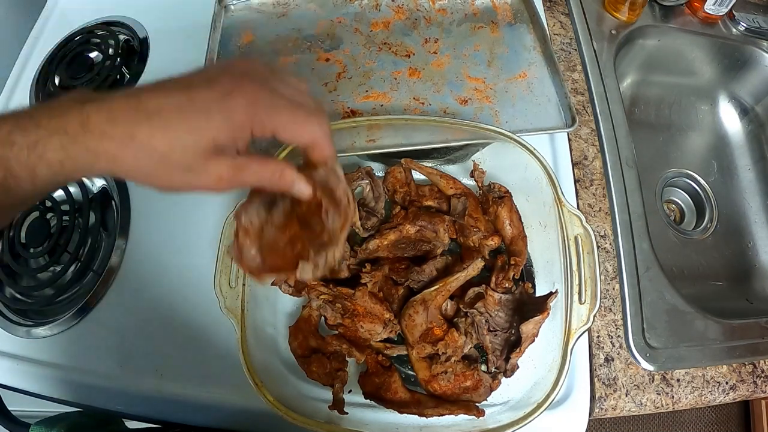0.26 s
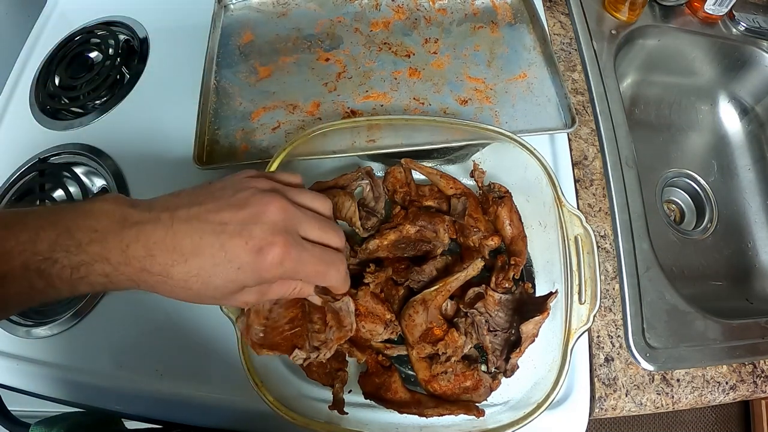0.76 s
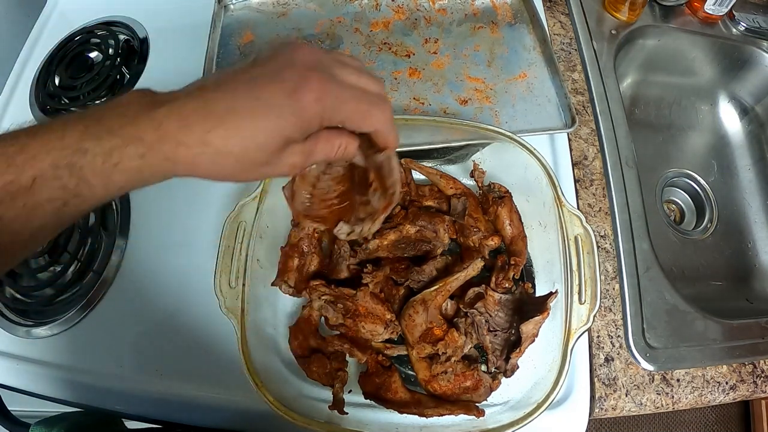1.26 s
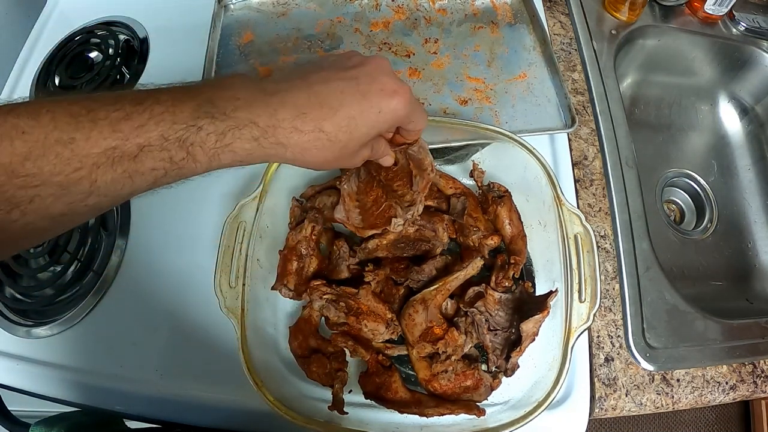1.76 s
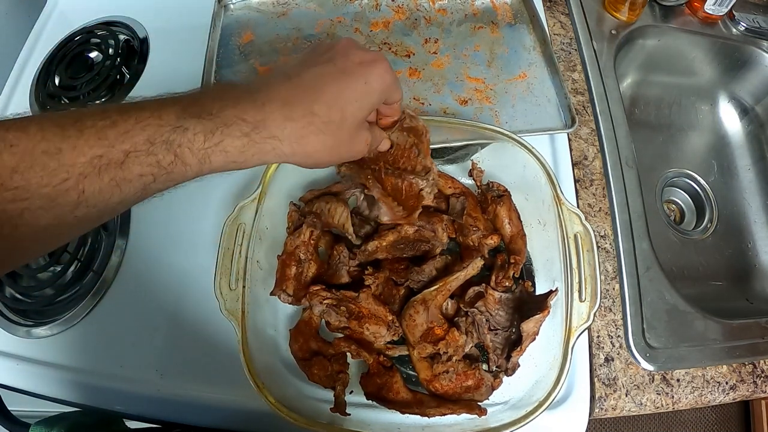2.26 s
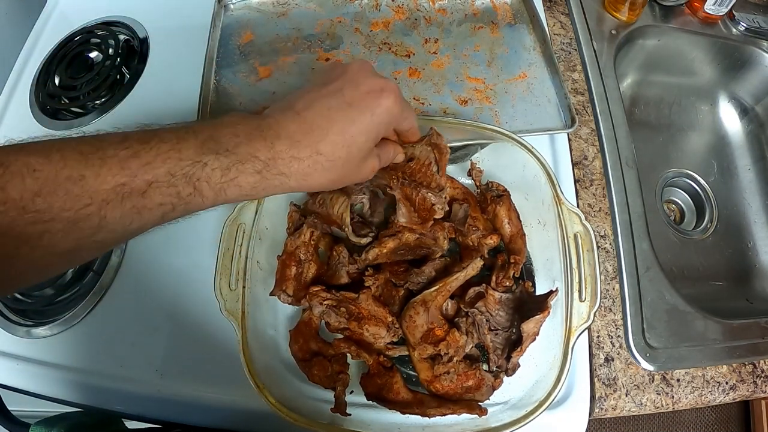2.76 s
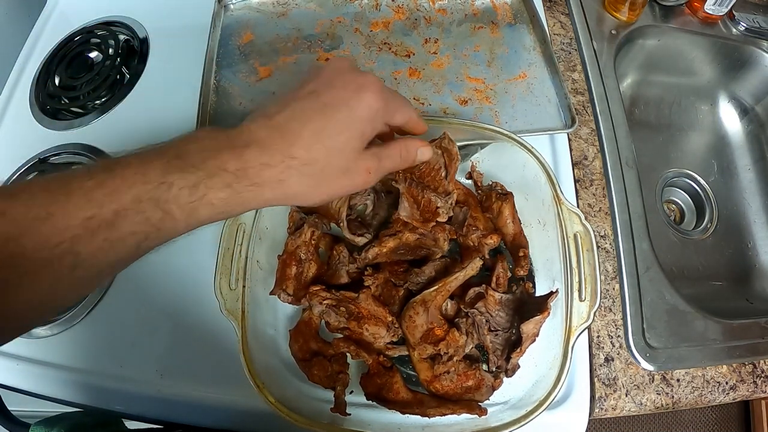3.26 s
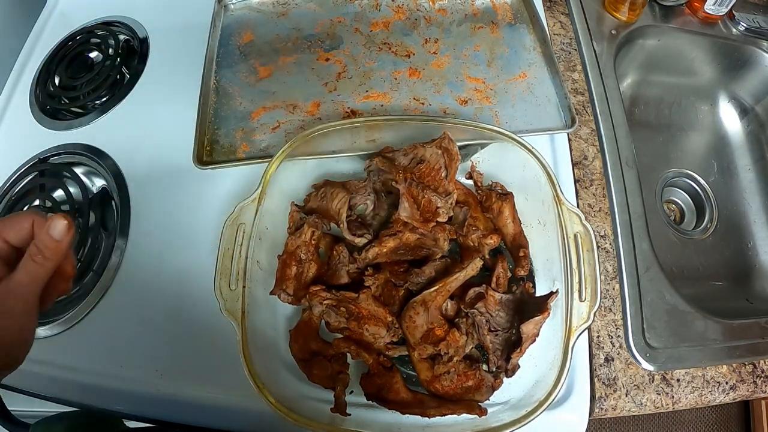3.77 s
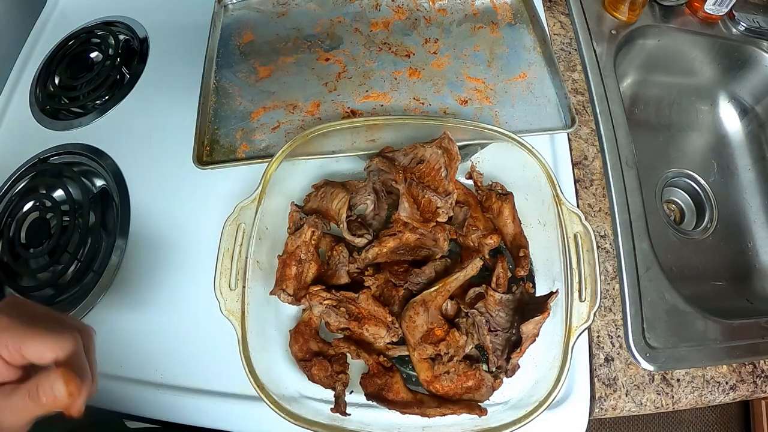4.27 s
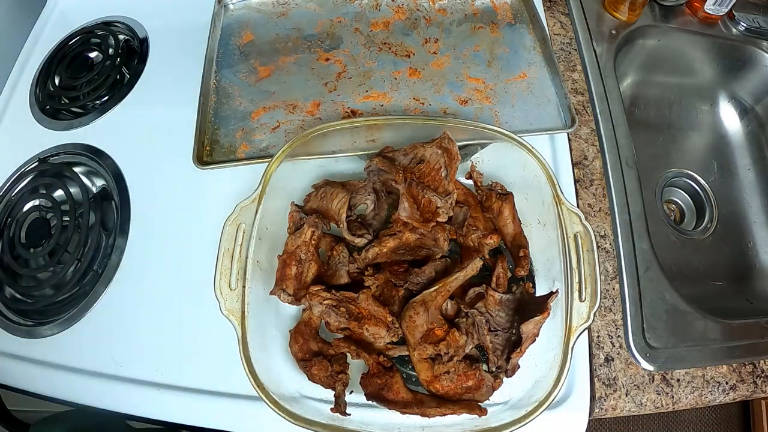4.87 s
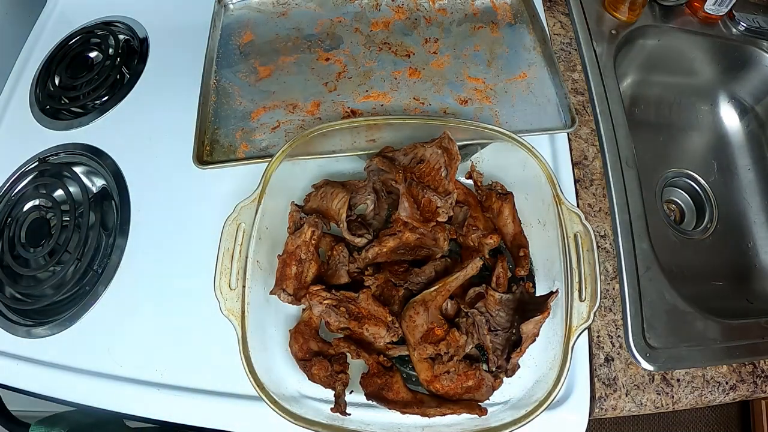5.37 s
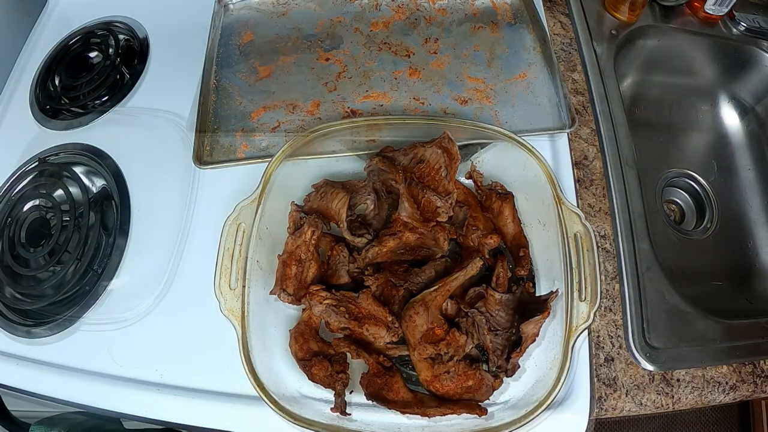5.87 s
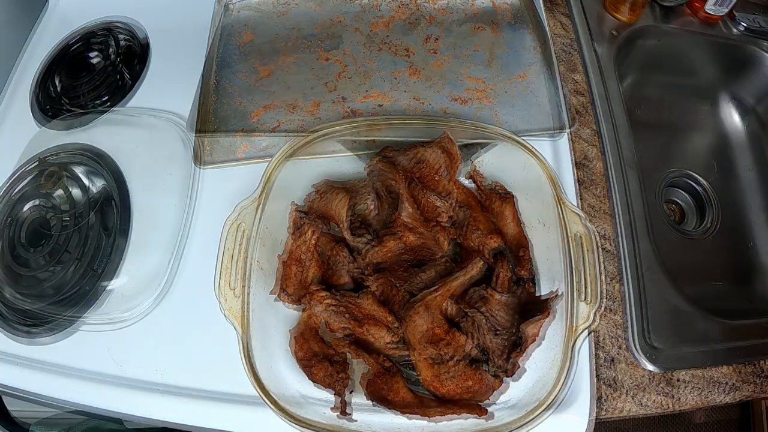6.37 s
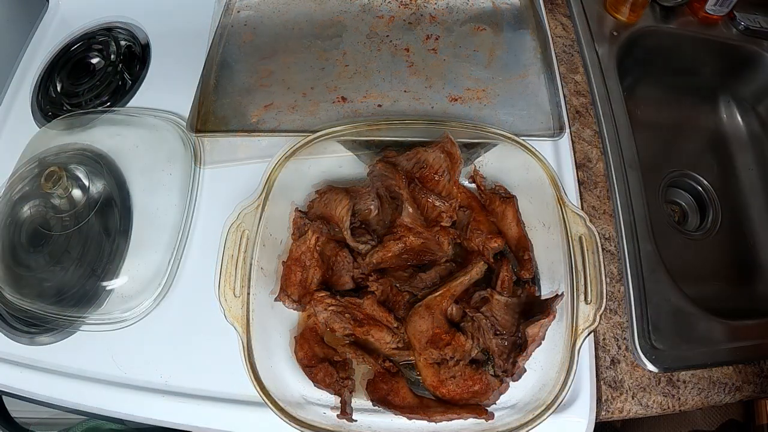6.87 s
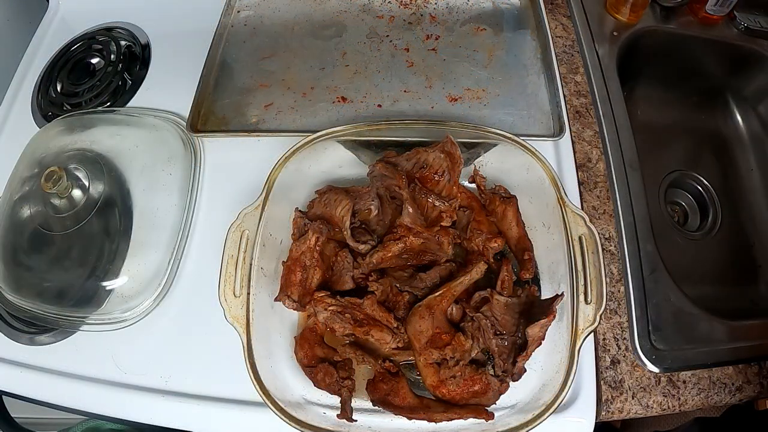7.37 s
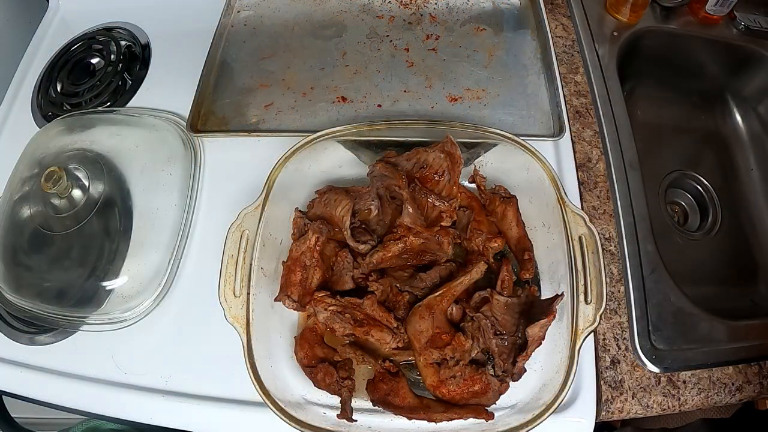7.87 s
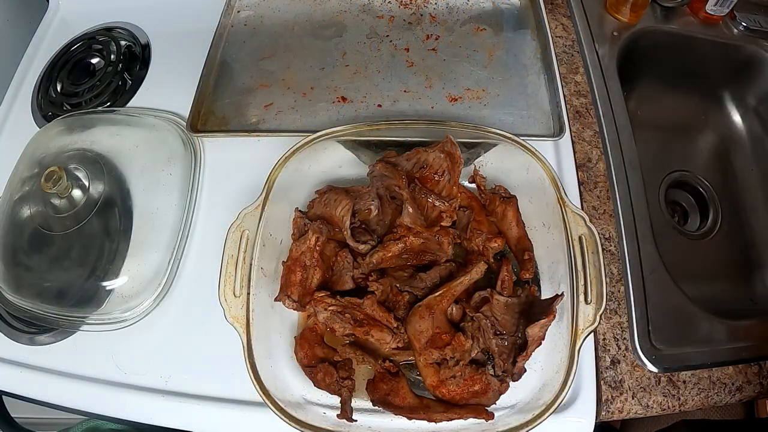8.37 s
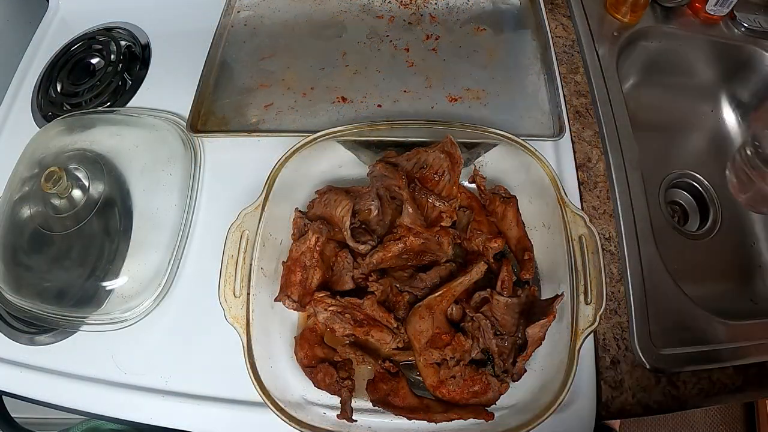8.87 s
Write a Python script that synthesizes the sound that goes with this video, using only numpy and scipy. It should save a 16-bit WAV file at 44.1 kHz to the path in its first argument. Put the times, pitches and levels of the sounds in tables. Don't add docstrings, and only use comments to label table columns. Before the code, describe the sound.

A close stereo microphone by a stove in a small kitchen, with faint room hum throughout. From 0 to 0.8 seconds a heavy glass dish is jolted and dragged, with dense short glassy chatter and gritty rattling of the enamel stove plate over low pushing rumble. It thins to a few touches, then knocks and scrapes again at 1.6 to 2.1. Small damp pops occur around 1.9 to 3.2. At 2.8 to 3.8 the dish rocks in bright knocks, loudest at 3.3, fading by 4.2. Cloth rustle and small taps follow at 4.3 to 4.9. From 5 low soft footfalls bump the floor. At 6.1 a cupboard door thuds with a low hollow ring and quick rebound. Light taps come at 6.5 to 7.2, then a tap hisses airily into a glass from 7.24 to 8.05, slightly left. Low bumps, a soft knock and rustling continue to just past 9.

```python
import sys
import numpy as np
from scipy import signal
from scipy.fft import rfft, irfft, next_fast_len
from scipy.io import wavfile
from scipy.ndimage import uniform_filter1d

SR = 44100
rng = np.random.default_rng(int(sys.argv[2]) if len(sys.argv) > 2 else 0)


def boost_factor(decibels):
    exponent = np.asarray(decibels, float) / 20
    return 10 ** exponent


def put_to_file(sound):
    columns = np.atleast_2d(sound).T
    safe = np.clip(columns, -1, 1)
    whole_steps = np.round(safe * 32767)
    wavfile.write(sys.argv[1], SR, whole_steps.astype(np.int16))


N = 401751

# time in seconds, peak level in dB, share of bass in dB, brightness in dB.
ROCKS = [(0.2211, -34, -16, -7), (0.7783, -35, -4, -19), (0.9504, -41, -16, -11.5), (1.184, -46, -3, -16),
         (1.4297, -47.5, -9, -16), (1.6122, -52, -26, -13), (1.649, -29, -3.5, -9),
         (1.8972, -28.5, -1.5, -8.5), (2.3546, -50, 2, -14), (2.5138, -43, -7.5, -1),
         (2.657, -52.5, -8.5, -9), (2.8448, -33, -2.5, -8), (3.0629, -30, -5.5, -7.5),
         (3.216, -32.5, -20, -9), (3.289, -23.5, 0.5, -2), (3.4065, -28.5, 1, -6),
         (3.5124, -27, -13.5, -6.5), (3.6401, -31.5, -5, -7.5), (3.7627, -36, -7.5, -8),
         (3.899, -38, -8, -10), (4.0502, -46, -6.5, -7.5), (4.205, -46.5, -8, -10)]
ROCK_TREBLE_DB = -11
BACKGROUND_CHANGE_S = (3.2, 6.4)


def rms_one(x):
    return x / np.sqrt(np.mean(x ** 2) + 1e-30)


def at_hz(points, hz):
    table_hz, value = np.array(points).T
    return np.interp(np.log(hz), np.log(table_hz), value)


def drift(rate_hz):
    step = 40
    r = np.exp(-2 * np.pi * step * rate_hz / SR)
    noise = rng.standard_normal(N // step + 2002)
    slow = signal.lfilter([1], [1, -2 * r, r * r], noise)[2000:]
    return np.interp(np.arange(N) / step, np.arange(len(slow)), rms_one(slow))


def background_change():
    return np.interp(np.arange(N) / SR, BACKGROUND_CHANGE_S, [0, 1])


def strike(times, gains):
    clicks = np.zeros(N)
    np.add.at(clicks, np.clip((np.asarray(times) * SR).astype(int), 0, N - 1), gains)
    return clicks


def ring(clicks, hz, t60):
    r = boost_factor(-60 / (t60 * SR))
    w = 2 * np.pi * hz / SR
    return signal.lfilter([0, np.sin(w)], [1, -2 * r * np.cos(w), r * r], clicks + 1e-18)


def burst(times, gains, rise_s, fall_s):
    fall = signal.lfilter([1], [1, -np.exp(-1 / (fall_s * SR))], strike(times, gains))
    r = np.exp(-1 / (rise_s * SR))
    return signal.lfilter([1 - r], [1, -r], fall)


def swell(s, db, rise_s, fall_s, hold_s=0):
    t = np.arange(0, N + 64, 64)[:, None] / SR
    before = (s - t) / rise_s
    after = (t - s - hold_s) / fall_s
    away = np.maximum(np.maximum(before, after), 0)
    return np.interp(np.arange(N) / SR, t[:, 0], boost_factor(db - 20 * away).sum(axis=1))


def grainy(per_s, spread_db, smooth):
    sizes = boost_factor(spread_db * np.minimum(rng.exponential(1, (2, N)), 4))
    sizes = sizes * (rng.random((2, N)) < per_s / SR)
    return rng.standard_normal((2, N)) * (smooth + rms_one(sizes))


def coloured(spectrum, source):
    # pitch in Hz, likeness from 0 to 1.
    likeness = [(100, 0.68), (500, 0.64), (1500, 0.68), (3000, 0.47), (6000, 0.42), (10000, 0.083)]
    size = next_fast_len(source.shape[1])
    hz = np.maximum(np.arange(size // 2 + 1) * SR / size, 1)
    alike = np.clip(at_hz(likeness, hz), 0, 1)
    mid, side = rfft(source, size) * boost_factor(at_hz(spectrum, hz)) * (hz > spectrum[0][0])
    mid = mid * np.sqrt(1 + alike)
    side = side * np.sqrt(1 - alike)
    return rms_one(irfft(np.array([mid + side, mid - side]), size)[:, :source.shape[1]])


def rumble(gain, band_hz):
    band = signal.butter(2, band_hz, "band", fs=SR, output="sos")
    noise = signal.sosfilt(band, rng.standard_normal(N))
    even = noise / np.sqrt(uniform_filter1d(noise ** 2, size=int(1.5 * SR / band_hz[0])) + 1e-12)
    lowpass = signal.butter(4, 1.39 * band_hz[1], fs=SR, output="sos")
    return signal.sosfiltfilt(lowpass, gain * rms_one(even))


def weight_rumble(rows, rise_s, fall_s, upper_hz, rest_db, presence):
    s, *levels = np.transpose(rows)
    out = 0
    for db, band_hz, still_db in zip(levels, ([22, 42], upper_hz), rest_db):
        out = out + rumble(swell(s, db, rise_s, fall_s) + presence * boost_factor(still_db), band_hz)
    return out


def share(events, hz, treble_offset_db):
    s, peak_db, bass_db, bright_db = np.transpose(events)
    if hz < 600:
        return peak_db + bass_db
    if hz < 1900:
        return peak_db
    if hz < 3800:
        return peak_db + bright_db
    return peak_db + 2.05 * bright_db + treble_offset_db


def plate():
    # time in seconds, peak level in dB, share of bass in dB, brightness in dB.
    jolts = [(.003, -36, -31, -2.5), (0.054, -32, -39, 0), (0.159, -30, -9, 1), (0.259, -29.5, -28, -3.5),
             (0.358, -38, -7, -6.5), (0.373, -33, -25, -4.5), (0.402, -45.5, -33, 0), (0.45, -41, -27, -8),
             (0.478, -40, -32, -5), (0.559, -38.5, -21, -7.5), (0.596, -37.5, -36, -3),
             (0.865, -53.5, -3, -7.5), (1.264, -58, -22, -20), (1.739, -40, -31, -6.5),
             (1.751, -48, -27, -3.5), (1.844, -50, 3, -11), (1.885, -45.5, -8, 0.5),
             (2.011, -41.5, 6.5, -3), (2.08, -41.5, -5, -6), (2.127, -48.5, 7, -12), (2.6, -56, -19, -11),
             (3.007, -55.5, 4, -4), (3.286, -31.5, -2.5, -9), (3.335, -38.5, -15, -7.5),
             (3.476, -35, 1, -6)]
    # time in seconds, level in dB, hold in seconds.
    drags = [
        (0, -37, 0.12),
        (0.197, -43.5, 0.42),
        (.968, -56.5, 0.0),
        (1.664, -48, 0.15),
        (1.92, -46.5, 0.023),
        (2.077, -58, 0),
        (3.293, -62, 0.16),
        (3.45, -74, 0),
    ]
    # pitch in Hz, width in Hz, level in dB.
    plate_modes = [(343, 240, -10), (423, 62, -1.5), (812, 170, -9), (1046, 150, -7), (1200, 186, -2),
                   (1670, 460, 1.5), (2345, 360, 4), (2950, 550, 2), (3230, 270, 0), (3630, 740, -3.5),
                   (4640, 570, 4), (5290, 770, 3), (6350, 830, 2.5), (7800, 1640, 0.5), (10800, 3200, -17)]
    jolt_treble_db = -2
    jolt_s, rock_s = np.array(jolts)[:, 0], np.array(ROCKS)[:, 0]
    drag_s, drag_db, hold_s = np.transpose(drags)
    drag = swell(drag_s, drag_db, rise_s=0.03, fall_s=0.11, hold_s=hold_s)
    grit = grainy(per_s=1500, spread_db=2.0, smooth=1.0)
    colour_db = 0.78 * rng.standard_normal((len(jolts), len(plate_modes)))
    out = 0
    for k, (hz, width_hz, level_db) in enumerate(plate_modes):
        fall_s = 0.031 * (1000 / hz) ** 0.4
        jolt_db = share(jolts, hz, jolt_treble_db)
        rock_db = share(ROCKS, hz, ROCK_TREBLE_DB) - (16 if hz > 3800 else 28)
        shake = burst(jolt_s, boost_factor(jolt_db - 10.5 + colour_db[:, k]), rise_s=0.00083, fall_s=fall_s)
        shake = shake + burst(rock_s, boost_factor(rock_db), rise_s=0.001, fall_s=1.2 * fall_s)
        shake = shake + drag * boost_factor(-8.5 - 8.9 * np.log2(max(hz, 900) / 900))
        band = ring(ring(grit[k % 2], hz, 1.66 / width_hz), hz, 1.22 / width_hz)
        snap = ring(strike(jolt_s, boost_factor(jolt_db - 10)), hz, 2.7 / width_hz)
        out = out + boost_factor(level_db) * (shake * rms_one(band) + (-1) ** k * snap)
    return out


def pushes():
    # time in seconds, deep level in dB, upper level in dB.
    push_rows = [(0, -56, -48.5), (.12, -66, -52), (.31, -63, -46), (.53, -69, -52.5), (.8, -78, -63),
                 (1.19, -74, -96.5), (1.73, -53, -53), (1.84, -69, -58), (2.03, -47.5, -52),
                 (2.22, -58, -67), (2.68, -71, -82), (2.92, -63, -55.5), (3.37, -49, -49), (3.59, -52, -59),
                 (3.83, -58.5, -72), (4.37, -69, -79)]
    return weight_rumble(push_rows, rise_s=0.1, fall_s=0.19, upper_hz=(137, 196),
                         rest_db=(-91, -75.5), presence=1 - background_change())


def hum():
    # pitch in Hz, level in dB per Hz.
    early_colour = [(20, -2), (110, -5.5), (330, 0.5), (620, -14), (1250, -9.5), (2300, -19), (3400, -29),
                    (7700, -31), (8600, -36.5), (15500, -51)]
    # pitch in Hz, level in dB per Hz.
    late_colour = [(35, -37), (60, -16.5), (170, -11.5), (350, -13.5), (500, -24), (1200, -31), (7700, -38),
                   (8600, -47), (15500, -55)]
    noise, changed = rng.standard_normal((2, N)), background_change()
    tone = (1 - changed) * boost_factor(-67) * coloured(early_colour, noise)
    tone = tone + changed * boost_factor(-69) * coloured(late_colour, noise)
    whine = boost_factor(-95.5) * np.sin(2 * np.pi * 10255 * np.arange(N) / SR)
    return boost_factor(1.3 * drift(1.8)) * tone + whine


def chatter():
    # time in seconds, peak level in dB, pitch in Hz, time to fall 60 dB in seconds.
    touches = [(.064, -28.5, 1670, .04), (.072, -41, 2190, .04), (.082, -39, 1200, .05),
               (.165, -29.5, 1715, 0.047), (.178, -42, 1150, .05), (.232, -38, 1220, .06),
               (.283, -38, 1005, .05), (.296, -36, 1020, .05), (.308, -33.5, 994, .04),
               (.378, -39, 2310, .05), (.385, -39, 800, .05), (.401, -36, 1240, 0.056),
               (.412, -42, 1170, .06), (.479, -38, 1000, 0.038), (.49, -37, 1650, .04),
               (.504, -36, 1200, 0.033), (.543, -39, 824, .04), (.583, -39, 855, 0.056),
               (.603, -35.5, 2210, 0.042), (.608, -36.5, 1230, 0.05), (.744, -44, 1050, 0.026),
               (.757, -48, 797, .04), (.767, -51, 1120, 0.024), (.792, -41, 1206, 0.044),
               (.794, -53, 2240, 0.045), (.869, -57.5, 2250, 0.085), (.962, -46.5, 1215, 0.073),
               (1.651, -50, 1520, 0.05), (1.74, -39, 1590, 0.024), (1.751, -36, 1133, 0.046),
               (1.765, -36.5, 1157, 0.046), (1.787, -45, 1200, 0.056), (1.887, -40, 2160, 0.027),
               (1.9, -35, 3220, 0.034), (1.93, -42, 502, 0.14), (1.95, -43, 1094, 0.057),
               (2.091, -41, 1230, 0.057), (2.108, -47, 1013, 0.09), (2.124, -43.5, 1214, 0.066),
               (3.289, -33.5, 5100, 0.026), (2.471, -65, 2700, .12), (2.846, -44, 1545, 0.056),
               (3.064, -44.5, 3227, 0.054), (3.289, -26.5, 1540, 0.043), (3.333, -36.5, 1595, 0.034),
               (3.513, -40, 3230, 0.04), (3.408, -41, 2170, 0.037), (3.485, -57, 4650, 0.092),
               (3.492, -38, 1150, 0.072), (3.641, -43, 1510, 0.066)]
    rise_s = 0.0017
    out, t = np.zeros(N + SR), np.arange(SR // 5) / SR
    for s, db, hz, t60 in touches:
        pair = np.sin(2 * np.pi * hz * t) + 0.31 * np.sin(2 * np.pi * 0.91 * hz * t)
        loudness = boost_factor(db + 3 - 60 * t / t60) * (1 - np.exp(-t / rise_s))
        out[int(s * SR):][:len(t)] += loudness * pair
    return out[:N]


def thumps():
    # time in seconds, peak level in dB, pitch in Hz, half length in seconds.
    drops = [(.08, -46, 167, 0.033), (.11, -49, 70, 0.013), (.31, -46, 70.4, .03),
             (.335, -44.5, 131.4, 0.066), (.43, -45, 125, 0.044), (.555, -43, 168.7, 0.051),
             (.755, -49, 155, .02), (.872, -49, 199, 0.0045), (1.82, -49, 147, .025),
             (2.656, -53, 228, 0.0075), (3.1, -56, 175, 0.071), (3.901, -61, 85, 0.031),
             (4.359, -69, 90, .04), (5.95, -53, 202, 0.018), (5.075, -37, 28.7, 0.03),
             (5.142, -42, 29.7, 0.028), (5.247, -41, 26, 0.03), (5.348, -43, 32.4, 0.029),
             (5.435, -42.5, 29.7, 0.037), (5.499, -39, 50, 0.018), (5.54, -38, 33.5, .022),
             (5.576, -35, 32.5, 0.045), (5.715, -47.5, 29.7, .035), (5.83, -27.5, 32.7, .018),
             (5.925, -41, 108, 0.014), (5.98, -37.5, 70, 0.016), (6.049, -44, 60, 0.017),
             (6.887, -42.5, 55, 0.015), (6.918, -45, 89, 0.021), (6.997, -50.5, 34.6, .04),
             (7.159, -43, 50, 0.025), (7.291, -36, 40.4, 0.021), (7.65, -41, 96, 0.026),
             (7.729, -42, 115, .03), (7.83, -44.5, 106, .035), (7.915, -43, 101, 0.022),
             (8.114, -36.5, 45, 0.037), (8.188, -42, 38, .025), (8.313, -36, 33.4, 0.03),
             (8.426, -47.5, 40, 0.03), (8.842, -39.5, 35.03, 0.036), (8.964, -31.5, 28, 0.03),
             (9.026, -34.5, 29.7, 0.015), (9.076, -38.5, 25.9, 0.077)]
    reach = SR // 5
    out, t = np.zeros(N + SR), np.arange(-reach, reach) / SR
    for s, db, hz, half_s in drops:
        load = np.exp(-(t / half_s) ** 2)
        out[int(s * SR):][:len(t)] -= boost_factor(db) * load * np.cos(2 * np.pi * hz * t)
    return out[reach:reach + N]


def rocks():
    # pitch in Hz, level in dB, time to fall 60 dB in seconds.
    dish_modes = [(354.5, -4, 0.2), (421, -13.5, 0.3), (492.3, -11.5, 0.13), (1037, -10.5, 0.097),
                  (1365, -3, 0.028), (1175, 0, 0.065), (1536, -1, 0.055), (1820, -36, 0.095),
                  (2170, 6, 0.043), (2663, 4, 0.041), (3220, -8.5, 0.098), (5100, -10, .05),
                  (7960, -22.5, .05)]
    muffled_modes, muffled_until_s, muffled_db = (6, 9, 10), 1.63, -9
    longest_t60_s = 0.075
    s = np.array(ROCKS)[:, 0]
    luck = rng.standard_normal((len(s), len(dish_modes)))
    out = 0
    for k, (hz, level_db, t60) in enumerate(dish_modes):
        db = share(ROCKS, hz, ROCK_TREBLE_DB) + level_db - 5.5 + 1.15 * luck[:, k]
        if k in muffled_modes:
            db = db + muffled_db * (s < muffled_until_s)
        mode = ring(strike(s, boost_factor(db)), hz, t60 if hz < 600 else min(t60, longest_t60_s))
        out = out + ring(mode, hz, 0.0082) * 1150 / SR
    return out


def ticks():
    # time in seconds, peak level in dB, pitch in Hz, time to fall 60 dB in seconds.
    taps = [(.734, -36.5, 790, 0.03), (.908, -42.5, 760, 0.036), (4.32, -41.5, 4250, 0.023),
            (2.652, -53.5, 486, 0.058), (8.78, -46, 4000, 0.043), (1.28, -55, 1500, .06),
            (2.618, -51, 1260, 0.046), (.87, -56, 1200, .08), (4.44, -52, 900, .06),
            (4.475, -47, 1200, 0.056), (4.816, -56, 3800, .004), (6.489, -39.5, 333, 0.04),
            (7.193, -34.5, 443, 0.046), (7.192, -55, 1800, 0.065), (6.5, -55, 1230, 0.066),
            (6.1, -59, 2500, 0.088), (6.706, -47, 284, 0.2), (6.72, -42.5, 4100, .004),
            (7.215, -35, 265, 0.14), (8.074, -32, 298, 0.062), (8.3, -50, 340, 0.073),
            (8.95, -42.5, 270, 0.11), (9.1, -45, 1400, 0.055)]
    out = 0
    for s, db, hz, t60 in taps:
        click = strike([s], boost_factor(db - 10))
        ratios = (0.97, 1.04) if hz > 900 else (0.75, 1, 1.4)
        group = sum(ring(click, hz * ratio, t60) for ratio in ratios)
        out = out + ring(group, hz, 3 / hz) * 5.24 * hz / SR
    return out


def smacks():
    # time in seconds, level in dB.
    unstuck = [(1.564, -61), (1.762, -61), (1.805, -59), (1.889, -38.5), (2.227, -66), (2.297, -65),
               (2.472, -62), (2.545, -60), (2.57, -69), (2.593, -57), (2.65, -52), (2.656, -60),
               (2.722, -68), (2.746, -69), (2.812, -70), (2.83, -70), (3.01, -63), (3.234, -53),
               (3.278, -56), (3.54, -60), (4.319, -65), (4.816, -53), (8.81, -62), (8.97, -47)]
    s, db = np.transpose(unstuck)
    pops = burst(s, boost_factor(db), rise_s=0.00033, fall_s=0.0021) * rng.standard_normal(N)
    return signal.sosfilt(signal.butter(4, (5500, 13000), "band", fs=SR, output="sos"), pops)


def rustle():
    # time in seconds, bright level in dB, dull level in dB, rise in seconds, fall in seconds.
    brushes = [(3.5, -78, -99, 1.8, 2.3), (4.06, -94, -60.5, 0.016, 0.69), (4.33, -67.5, -66, 0.24, 0.13),
               (4.475, -63.5, -42, 0.15, 0.089), (4.65, -80.5, -83, 0.38, 1.3),
               (4.818, -51.5, -87, 0.0083, 0.1), (4.93, -67, -67, 0.15, 0.51),
               (5.09, -58.5, -57.5, 0.01, 0.19), (5.29, -84, -71.5, 0.82, 0.32),
               (5.46, -56.5, -56, 0.073, 0.14), (5.65, -76.5, -59, 0.13, 0.67),
               (5.838, -72.5, -83, 0.061, 0.16), (6.2, -74.5, -72, 0.31, 0.51), (6.5, -76, -64, 0.18, 0.29),
               (6.73, -62, -74, 0.15, 0.075), (6.8, -66, -55, 0.1, 0.21), (8.13, -71, -52, 0.38, 1.4),
               (8.714, -61.5, -67.5, 0.49, 0.045), (8.78, -58.5, -85, 0.053, 0.11),
               (8.988, -71.5, -79, 0.14, 0.07), (9.11, -62, -51.5, 0.23, .1)]
    # pitch in Hz, level in dB per Hz.
    bright_colour = [(710, -29.5), (1200, -10), (1600, -3.5), (1780, -2), (1900, 0.5), (3320, 2.5),
                     (7250, -2), (12600, -27), (15500, -35)]
    # pitch in Hz, level in dB per Hz.
    dull_colour = [(250, 6.5), (500, -0.5), (760, 2.5), (950, 6.5), (1400, 6), (2200, 0.5), (3500, -35)]
    s, bright_db, dull_db, rise_s, fall_s = np.transpose(brushes)
    fine = coloured(bright_colour, grainy(per_s=1300, spread_db=2.0, smooth=4.2))
    coarse = coloured(dull_colour, grainy(per_s=400, spread_db=0.0, smooth=2.6))
    bright = boost_factor(3.0 + 1.46 * drift(23)) * swell(s, bright_db, rise_s, fall_s) * fine
    dull = boost_factor(-7.5 + 2.3 * drift(14)) * swell(s, dull_db, rise_s, fall_s) * coarse
    return bright * boost_factor(np.array([[0.8], [-0.8]])) + dull


def steps():
    # time in seconds, deep level in dB, upper level in dB.
    step_rows = [(5.07, -48, -64), (5.16, -69, -57), (5.27, -67, -90), (5.37, -54, -88.5),
                 (5.54, -45, -57.5), (5.65, -60, -74), (5.828, -48, -62), (5.93, -51, -42), (6.0, -61, -59),
                 (6.09, -60, -59), (6.27, -45.5, -53), (6.37, -57, -65), (6.51, -62, -53.5),
                 (6.75, -81, -55.5), (6.9, -58, -49), (7.02, -68, -81), (7.16, -53, -44.5), (7.3, -49, -55),
                 (8.1, -49, -32.5), (8.165, -49, -41), (8.33, -49, -56.5), (8.44, -51, -67),
                 (8.82, -46, -47.5), (8.97, -46, -50.5), (9.03, -58, -54), (9.09, -43, -65)]
    return weight_rumble(step_rows, rise_s=0.053, fall_s=0.1, upper_hz=(56.6, 135.3),
                         rest_db=(-66.5, -103), presence=background_change())


def door():
    # time in seconds, level in dB.
    contacts = [
        (6.109, -32),
        (6.118, -26),
        (6.129, -32.5),
        (6.205, -37.5),
    ]
    # pitch in Hz, level in dB, time to fall 60 dB in seconds.
    panel_modes = [(63.3, -4, 1), (88.1, -4.5, 0.4), (93.8, 0, 0.32), (138.5, -7.5, 0.27),
                   (166, -16.5, 0.5), (212, -16, 0.22), (213.8, -5.5, 0.27), (266, -25, 0.56),
                   (322, -30.5, .5), (489.5, -23, 0.34)]
    # time in seconds, level in dB.
    edge_cracks = [
        (6.109, -36.5),
        (6.124, -45),
        (6.146, -57),
        (6.21, -80),
    ]
    # pitch in Hz, level in dB per Hz.
    crack_colour = [(240, -49), (400, -20), (533, -1), (771, -7.5), (1020, 1), (1210, -4.5), (1510, -5.5),
                    (5090, -11.5), (10500, -24), (14500, -45), (22000, -120)]
    s, db = np.transpose(contacts)
    panel = sum(ring(strike(s, boost_factor(db + level_db)), hz, t60) for hz, level_db, t60 in panel_modes)
    panel = signal.sosfilt(signal.butter(2, 600, fs=SR, output="sos"), panel)
    s, db = np.transpose(edge_cracks)
    crack = coloured(crack_colour, rng.standard_normal((2, N)))[0]
    dull = signal.sosfilt(signal.butter(2, 2500, fs=SR, output="sos"), crack)
    bright = burst(s, boost_factor(db), rise_s=0.0041, fall_s=0.0092) * (crack - dull)
    return panel + bright + burst(s, boost_factor(db), rise_s=0.006, fall_s=0.028) * dull


def flow():
    open_s = 7.236
    after = np.maximum(np.arange(N) / SR - open_s, 0)
    settling = boost_factor(-4 * np.exp(-after / 0.029))
    return swell(open_s, 0, rise_s=0.022, fall_s=0.095, hold_s=0.79) * settling


def pipe():
    return rumble(boost_factor(-49.5 + 3.4 * drift(9.5)) * flow(), (80, 129.7))


def tap():
    # pitch in Hz, level in dB per Hz.
    jet_colour = [(180, -19), (300, -14), (384, -12), (461, -19.5), (652, -12), (822, -17.5), (954, -9.5),
                  (1370, -12), (2140, -3), (2570, -5), (4080, -1.5), (7650, -7), (15600, -22)]
    # pitch in Hz, width in Hz, level in dB, start in seconds, end in seconds.
    water_modes = [(1740, 120, -11, 7.23, 7.4), (676, 38, -19, 7.38, 7.5), (2170, 100, -15, 7.55, 8.05),
                   (980, 130, -17, 7.63, 8.05), (2780, 120, -12, 7.2, 7.36), (4110, 190, -9.5, 7.26, 8.2),
                   (3780, 90, -19, 7.85, 8.1), (3400, 110, -17, 7.55, 7.78), (1630, 150, -10, 7.31, 7.48),
                   (7600, 150, -18, 7.2, 7.33), (5700, 130, -16, 7.4, 7.6), (7700, 800, -15, 7.2, 8.2)]
    # pitch in Hz, left minus right in dB.
    left_lean = [(300, -0.5), (700, 1), (2400, 4.5), (4400, 2.5), (8000, 0), (15000, -0.5)]
    t = np.arange(N) / SR
    spray = coloured(jet_colour, grainy(per_s=6600, spread_db=1.5, smooth=2.7))
    hz_axis = np.arange(1, N // 2 + 2) * SR / N
    lean = boost_factor(at_hz(left_lean, hz_axis) * np.array([[0.5], [-0.5]]))
    jet = irfft(rfft(spray) * lean, N)
    water = jet
    for hz, width_hz, level_db, start, end in water_modes:
        present = np.clip(np.minimum(t - start, end - t) / 0.08 + 0.5, 0, 1)
        resonance = rms_one(ring(jet, hz, 2.2 / width_hz))
        water = water + present * boost_factor(level_db + 2.2 * drift(7)) * resonance
    return boost_factor(-36) * flow() * boost_factor(0.2 * drift(29.0) - 0.75) * water


def kitchen(x):
    # pitch in Hz, time to fall 60 dB in seconds.
    room_decay = [(100, 0.28), (500, 0.32), (2000, 0.24), (6000, 0.12), (12000, 0.098)]
    band_edges = 18 * 2 ** np.arange(0, 10.1, .5)
    t = np.arange(SR // 2) / SR
    white = coloured([(20, 0), (20000, 0)], rng.standard_normal((2, len(t))))
    tail = 0
    for low, high in zip(band_edges, band_edges[1:]):
        band = signal.sosfilt(signal.butter(2, [low, high], "band", fs=SR, output="sos"), white)
        tail = tail + band * boost_factor(-60 * t / at_hz(room_decay, low))
    tail = tail * (1 - np.exp(-t / 0.0028))
    return signal.fftconvolve(x[None], tail / np.sqrt(np.sum(tail ** 2)), axes=1)[:, :N]


def scene():
    glass = rocks() + chatter()
    metal = signal.sosfilt(signal.butter(4, 13500, fs=SR, output="sos"), plate())
    other = door() + ticks() + smacks()
    stove = (glass + metal) * boost_factor(np.array([[-0.5], [0.5]]))
    direct = stove + other + pushes() + steps() + pipe() + thumps() + rustle()
    direct[0] = np.roll(direct[0], 2)
    other_above_bass = signal.sosfilt(signal.butter(2, 150, "high", fs=SR, output="sos"), other)
    to_room = boost_factor(-7.0) * glass + boost_factor(-4.5) * metal + boost_factor(-2.0) * other_above_bass
    return direct + kitchen(to_room) + tap() + hum()


def band_limit(x):
    return signal.sosfilt(signal.butter(12, 15720, fs=SR, output="sos"), x)


def record(dry):
    mix = signal.sosfilt(signal.cheby2(20, 50, 15760, fs=SR, output="sos"), dry)
    return band_limit(mix)


dry = scene()
out = record(dry)
put_to_file(out)
```